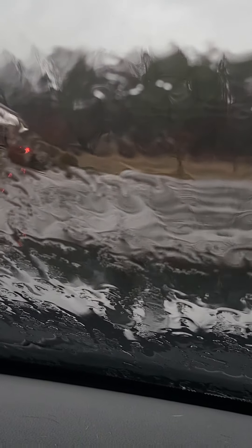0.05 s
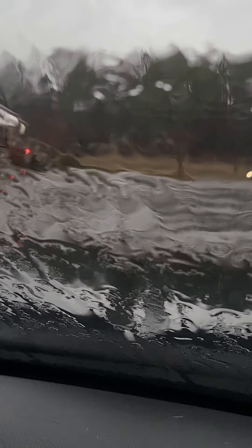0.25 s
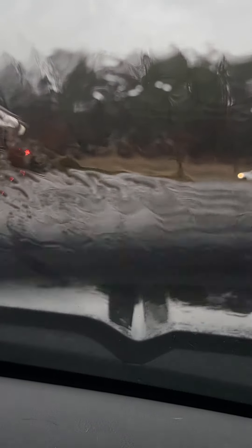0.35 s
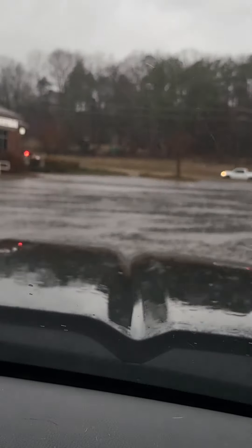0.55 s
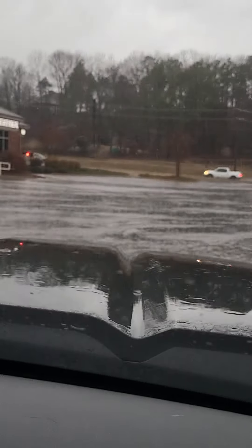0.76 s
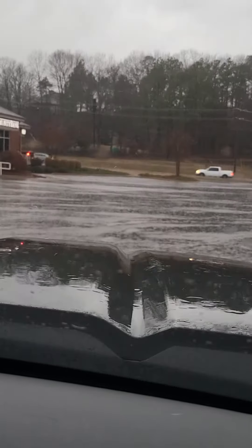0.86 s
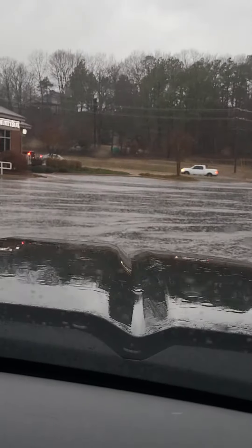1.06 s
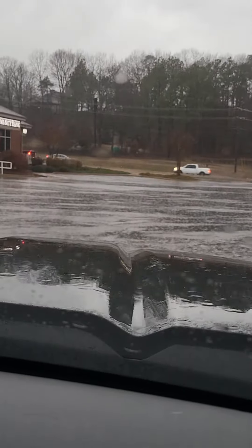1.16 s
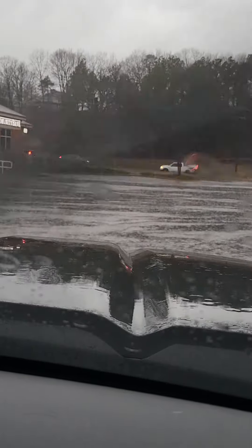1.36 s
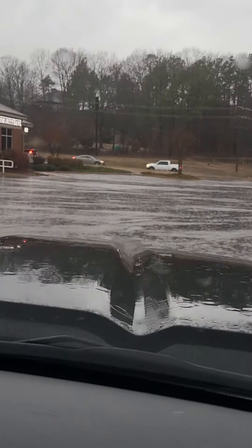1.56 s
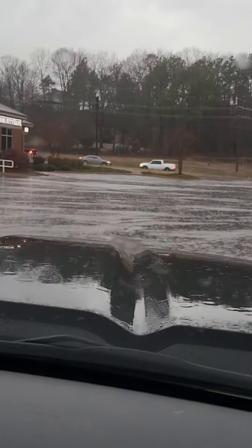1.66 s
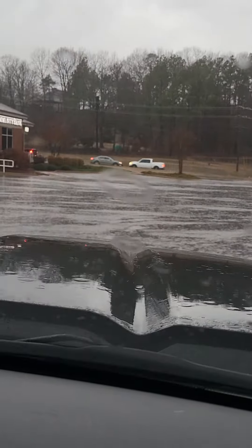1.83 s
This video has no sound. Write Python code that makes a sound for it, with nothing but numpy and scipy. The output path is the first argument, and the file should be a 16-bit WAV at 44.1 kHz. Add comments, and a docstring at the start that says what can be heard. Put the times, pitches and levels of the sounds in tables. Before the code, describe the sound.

Steady rain drumming on a parked car heard from inside, with deep wiper thuds and faint engine hum

```python
"""In the front seat of a standing car, rain patters on the windshield and roof over a low idle rumble.
Drops are short noise bursts with decaying echoes of the cabin; near ones also ring modes of the glass.
The wipers turn twice: the body booms as a sagging tone with an overtone, and rebounds after the first turn.
Blades flap as swelling noise and knock decaying modes of the cowl; hum and idle are wavering sines."""
import sys
import numpy as np
from scipy import signal
from scipy.fft import rfft, irfft, next_fast_len
from scipy.io import wavfile
from scipy.ndimage import map_coordinates

SR = 44100
rng = np.random.default_rng(int(sys.argv[2]) if len(sys.argv) > 2 else 0)


def put_to_file(sound):
    """Save the sound as 16-bit audio at rate SR, in the file named by the first command-line argument."""
    columns = np.atleast_2d(sound).T  # one column per channel
    safe = np.clip(columns, -1, 1)
    whole_steps = np.round(safe * 32767)
    wavfile.write(sys.argv[1], SR, whole_steps.astype(np.int16))


N = 83790


def amp(db):
    """Decibels express the logarithm of an amplitude ratio; return that ratio."""
    return 10 ** (np.asarray(db) / 20)


def unit(x):
    """Mean power sets the level of a noise: scale to an rms of 1."""
    return x / np.sqrt(np.mean(x ** 2) + 1e-20)


def along(points, hz):
    """A spectral envelope is interpolated on a logarithmic frequency axis, from (frequency [Hz], value)."""
    f, v = np.transpose(points)
    return np.interp(np.log(hz + 1), np.log(f + 1), v)


def curve(rows):
    """A slow envelope is linear between its (time [s], value) points; one value per sample."""
    return np.interp(np.arange(N) / SR, *np.transpose(rows))


def wobble(rate):
    """Slow random modulation: a smooth spline through normal random knots, rate knots a second."""
    knots = rng.standard_normal(int(N * rate / SR) + 4)
    return map_coordinates(knots, [np.arange(N) * rate / SR])


def swell(s, half_s):
    """A Gaussian envelope rises and falls around time s, down to 1/e at half_s either side."""
    return np.exp(-((np.arange(N) / SR - s) / half_s) ** 2)


def panned(db):
    """Interaural level difference: left and right gains, with positive db louder on the left."""
    return amp(np.array([[db], [-db]]) / 2)


def coloured(pair, spectrum):
    """Minimum-phase filtering colours two signals; mid-side mixing sets their interaural coherence."""
    # likeness of left and right in the cabin: (frequency [Hz], coherence [0 to 1])
    likeness = [(60, 0.97), (270, 0.96), (500, 0.93), (1000, 0.14), (3000, 0.0023), (12000, 0)]
    m = 2 * next_fast_len(pair.shape[1])
    hz = np.fft.rfftfreq(m, 1 / SR)
    # folding the cepstrum onto positive times makes the filter causal
    cepstrum = irfft(np.log(amp(along(spectrum, hz))))
    cepstrum[1:m // 2] *= 2
    cepstrum[m // 2 + 1:] = 0
    response = np.exp(rfft(cepstrum))
    # mid power minus side power equals the coherence
    turn = np.arccos(np.clip(along(likeness, hz), -1, 1)) / 2
    weights = [np.cos(turn), np.sin(turn)]
    mid, side = irfft(rfft(pair, m) * response * weights)[:, :pair.shape[1]]
    return np.array([mid + side, mid - side])


def noise(spectrum):
    """Stationary noise is white noise through a filter: stereo, of rms 1, with the filter's onset cut off."""
    white = rng.standard_normal((2, N + SR // 2))
    return unit(coloured(white, spectrum)[:, -N:])


def rumble():
    """Phase-modulated tones: the body's hum and the engine's idle, over the cabin's broadband drone."""
    # colour of the cabin's drone: (frequency [Hz], relative level [dB per Hz])
    cabin_colour = [(22, -16), (36, -2.5), (52, -0.5), (105, -3.5), (140, -11.5), (200, -8), (270, -17.5),
                    (360, -15.5), (550, -29.5), (1500, -62.5)]
    # hum of the body, swelling and bending as the wipers sweep: (time [s], pitch [Hz], level [dB rms])
    hum_rows = [(0, 81.9, -45.5), (.4, 82.54, -36.5), (.45, 83.2, -35), (.54, 82.4, -39.5),
                (0.644, 78.93, -30), (.72, 75.7, -38), (.88, 71.24, -37), (.95, 65.6, -29.5),
                (1.07, 63.97, -38), (1.135, 63.3, -27), (1.219, 70.6, -43), (1.3, 73.1, -32.5),
                (1.37, 76.1, -47), (1.53, 75.3, -32.5), (1.63, 75.1, -32), (1.7, 78.54, -51)]
    IDLE_HZ, IDLE_DB, DRONE_DB = 41.05, -45.5, -39.5
    WAVER_RAD = 0.71
    t, rows = np.arange(N) / SR, np.array(hum_rows)
    pitch_hz, level_db = curve(rows[:, :2]), curve(rows[:, ::2])
    hum_phase = 2 * np.pi * np.cumsum(pitch_hz) / SR + WAVER_RAD * wobble(6.16)
    hum = amp(level_db) * np.sin(hum_phase)
    idle = amp(IDLE_DB) * np.sin(2 * np.pi * IDLE_HZ * t + WAVER_RAD * wobble(6))
    # the root of 2 turns rms levels into peak amplitudes
    return np.sqrt(2) * (hum + idle) + amp(DRONE_DB) * noise(cabin_colour)


def splat(spectrum, crack_t60_s, rise_s, size=4096):
    """Impact and reverberation: a crack, a short shiver of the pane, then the cabin's answer; energy 1."""
    GLASS_T60_S, GLASS_DB = 0.014, -9.5
    CABIN_T60_S, CABIN_DB, CABIN_RISE_S = 0.071, -12, 0.01
    t = np.arange(size) / SR
    crack = amp(-60 * t / crack_t60_s)
    shiver = amp(GLASS_DB - 60 * t / GLASS_T60_S)
    hit = (crack + shiver) * (1 - np.exp(-t / rise_s))
    answer = amp(CABIN_DB - 60 * t / CABIN_T60_S) * (1 - np.exp(-t / CABIN_RISE_S))
    drop = coloured((hit + answer) * rng.standard_normal((2, size)), spectrum)
    return drop / np.sqrt(np.sum(drop ** 2) / 2)


def shower(spectrum, per_s, spread_db, count=16):
    """Shot noise: drops of random size land at random on count spots from left to right; rms 1."""
    CRACK_T60_S, CRACK_RISE_S, PAN_SPREAD_DB = 0.0053, 0.0014, 0.5
    out = np.zeros((2, N))
    for side in np.linspace(-1, 1, count):
        lands = rng.random(N) < per_s / count / SR
        # the largest drops are capped at 1.5 deviations
        sizes = amp(spread_db * np.minimum(rng.standard_normal(N), 1.5))
        drop = splat(spectrum, CRACK_T60_S, CRACK_RISE_S)
        spot = signal.fftconvolve((lands * sizes)[None], drop, axes=1)[:, :N]
        out += spot * panned(side * PAN_SPREAD_DB)
    return unit(out)


def pings(size=2048):
    """Damped resonance: some drops ring a panel for a few cycles, each at its own pitch."""
    PINGS_PER_S, LOWEST_HZ, HIGHEST_HZ = 100, 949, 2970
    DECAY_CYCLES, WEAKEST_DB, RANGE_DB = 10, -0.5, 8
    out, t = np.zeros((2, N + size)), np.arange(size) / SR
    for when, pitch, strength, left, right in rng.random((int(PINGS_PER_S * N / SR), 5)):
        cycles = (LOWEST_HZ + pitch * (HIGHEST_HZ - LOWEST_HZ)) * t
        fade = np.exp(-cycles / DECAY_CYCLES) * (1 - np.exp(-cycles))
        ring = np.sin(2 * np.pi * (cycles + np.array([[left], [right]])))
        out[:, int(when * N):][:, :size] += amp(WEAKEST_DB + RANGE_DB * strength) * fade * ring
    return out[:, :N]


def rain():
    """Superposition: patter, spray, pings and the wash of rain outside share one strength envelope."""
    # strength of the rain: (time [s], level [dB])
    strength = [(0, -49), (.08, -51.5), (.14, -50), (.42, -47), (.47, -52), (.51, -48), (.78, -46),
                (.9, -44.5), (.98, -48.5), (1.16, -43.5), (1.21, -46), (1.36, -43.5), (1.65, -43),
                (1.75, -48), (1.8, -43.5), (1.9, -45)]
    # colour of the dense patter: (frequency [Hz], relative level [dB per Hz])
    patter_colour = [(100, -22), (220, -2), (370, 4.5), (520, -8.5), (630, 3.5), (760, -3), (1000, 2),
                     (1400, 4), (1680, -8), (1900, 1), (2200, 0), (2750, -2), (3200, -8), (3650, -6),
                     (4600, -15), (7000, -21.5), (8600, -27), (12000, -29), (16000, -35)]
    # colour of the bright spray: (frequency [Hz], relative level [dB per Hz])
    spray_colour = [(500, -9), (3000, -16), (7000, 27), (8600, -11), (12000, 1), (16000, 1.5)]
    # colour of the wash behind the patter: (frequency [Hz], relative level [dB per Hz])
    wash_colour = [(88, -44.5), (150, -4), (366, -4.5), (420, -9.5), (844, -8.5), (1240, -15),
                   (1700, -12.5), (2760, -19), (5030, -32), (7270, -32.5), (8660, -49.5), (15500, -41)]
    PATTER_DB, SPRAY_DB, WASH_DB = 0.5, -24, -2.5
    patter = amp(PATTER_DB) * shower(patter_colour, per_s=420, spread_db=5.5)
    spray = amp(SPRAY_DB) * shower(spray_colour, per_s=64, spread_db=3)
    wash = amp(WASH_DB) * noise(wash_colour)
    return amp(curve(strength)) * (patter + spray + pings() + wash) * panned(db=-1)


def near_drops():
    """Impact excitation of modes: big drops tick on the windshield and set the pane ringing."""
    # near drops: (time [s], level [dB], treble [dB], body [dB], left over right [dB], ring [dB re level])
    drops = [(0.135, -30.5, -26, -2.5, -9.5, -19), (0.1635, -30.5, -21.5, 5, 0, -3.5),
             (0.2528, -34, -24, -8.5, -5.5, 0), (0.2969, -35.5, -17.5, 1, -11, -4),
             (0.3077, -37, -31, -4, -10, -2), (0.3583, -37, -39, 0, 0, -8), (0.4295, -35, -31, 7, 2, 0),
             (0.5091, -34.5, -47, -5, -3, -2), (0.598, -38.5, -30, 0, -7, 9),
             (0.631, -35.5, -23.5, -13, -10, -22), (0.696, -30.5, -36, 1, 1, -5),
             (0.7483, -27, -30.5, -6, -2, -7), (0.826, -28.5, -32, 1.5, -3, -3),
             (0.851, -36, -51, -7, -4, 5.5), (0.877, -26, -58, -7, -3, -8), (1.033, -34.5, -34, -22, 1, 8),
             (1.06, -30, -35.5, -39, -10, -19), (1.0763, -23, -34, -1.5, 1.5, -30),
             (1.1182, -29.5, -25.5, -3, -10.5, -6), (1.1532, -24.5, -29, 5.5, -1.5, -5.5),
             (1.2545, -33, -24.5, -5, -1, 1), (1.3587, -27.5, -27.5, -4, -2.5, -2),
             (1.4717, -28, -21, 13, -0.5, -9), (1.5217, -25, -24.5, 6, -1, -7),
             (1.6274, -39.5, -1, 1, -1, 9), (1.6907, -30, -27, -9, 1, 1), (1.7787, -30, -26, 1, 0, -27)]
    # usual colour of a tick: (frequency [Hz], relative level [dB])
    tick_colour = [(150, -42), (400, -1), (1300, 2.5), (2700, 3.5), (3800, -2), (5000, -7.5), (7200, -9.5),
                   (8800, -21.5), (12000, -17), (16000, -23)]
    # modes of the windshield: (frequency [Hz], level [dB])
    pane_modes = [(1330, -3.5), (1950, -8), (2460, -1), (2770, -11)]
    TICK_DB, TREBLE_USUAL_DB, BODY_USUAL_DB = 15.5, -24, -4.5
    CRACK_T60_S, CRACK_RISE_S = 0.0072, 0.0023
    RING_T60_S, RING_RISE_S = 0.045, 0.0018
    out = np.zeros((2, N + SR))
    for s, db, treble_db, body_db, pan_db, ring_db in drops:
        # treble and body tilt the usual colour by their departure from the usual
        tilt = [(1200, body_db - BODY_USUAL_DB), (2800, 0.009), (9000, treble_db - TREBLE_USUAL_DB)]
        colour = [(hz, level + along(tilt, hz)) for hz, level in tick_colour]
        tick = amp(TICK_DB) * splat(colour, CRACK_T60_S, CRACK_RISE_S)
        t = np.arange(tick.shape[1]) / SR
        fade = amp(ring_db - 60 * t / RING_T60_S) * (1 - np.exp(-t / RING_RISE_S))
        modes = np.zeros_like(tick)
        for hz, level in pane_modes:
            strength = amp(level + 2 * rng.standard_normal())
            modes += strength * np.sin(2 * np.pi * hz * t + np.pi * rng.random((2, 1)))
        ring = fade * modes / 2
        out[:, round(s * SR):][:, :len(t)] += amp(db) * (tick + ring) * panned(pan_db)
    return out[:, :N]


def body_booms():
    """Transient body resonance: a tone of sagging pitch and an inharmonic overtone swell and fade."""
    # wiper thumps and a rebound: (time of the height [s], pitch there [Hz], level [dB], half length [s])
    thumps = [(0.246, 75.1, -12.5, 0.024), (.369, 68, -20.5, 0.02), (1.000, 65.6, -13, 0.036)]
    SAG_PER_S, OVERTONE_RATIO, OVERTONE_DB = 0.88, 2.77, -24
    t, out = np.arange(N) / SR, np.zeros((2, N))
    for s, hz, db, half_s in thumps:
        phase = 2 * np.pi * hz * (t - s) * (1 - SAG_PER_S * (t - s) / 2)
        tone = np.cos(phase) + amp(OVERTONE_DB) * np.sin(OVERTONE_RATIO * phase)
        out += amp(db) * swell(s, half_s) * tone
    return out


def blade_flips():
    """Modal excitation: blades flip or catch with a dull flap of noise and knock the cowl's damped modes."""
    # flips of the rubber blades: (time [s], flap level [dB], knock level [dB], half length of flap [s])
    flips = [(.2375, -25.5, -31.5, 0.023), (0.308, -34, -41.5, 0.01), (0.956, -29, -22, 0.021),
             (1.075, -32, -37, 0.0087), (1.586, -36, -40, 0.011), (1.699, -37, -40.5, 0.01)]
    # colour of the flap: (frequency [Hz], relative level [dB per Hz])
    flap_colour = [(60, -13.5), (115, 9.5), (180, -2.5), (260, -14), (340, -15), (450, -13), (560, -28.5),
                   (900, -21.5), (3000, -77)]
    # modes under the wiper arms: (frequency [Hz], level [dB], decay time t60 [s])
    cowl_modes = [(181.3, -3, 0.2), (284, -3.5, 0.092), (337, -7.5, 0.091)]
    FLAP_LAG_S, KNOCK_RISE_S = 0.007, 0.0012
    t, out, flap = np.arange(N) / SR, np.zeros((2, N)), noise(flap_colour)
    for s, flap_db, knock_db, half_s in flips:
        age = np.maximum(t - s, 0)
        knock = np.zeros(N)
        for hz, db, t60 in cowl_modes:
            knock += amp(db - 60 * age / t60) * np.sin(2 * np.pi * hz * age)
        out += amp(knock_db) * knock * (1 - np.exp(-age / KNOCK_RISE_S))
        out += amp(flap_db) * swell(s + FLAP_LAG_S, half_s) * flap
    return out


def wipers():
    """Superposition: booms of the body add to the flaps and knocks of the blades."""
    return body_booms() + blade_flips()


def scene():
    """Linear superposition of every source, as heard from the front seat."""
    return rumble() + rain() + near_drops() + wipers()


def record(dry):
    """Band limitation: the microphone keeps nothing above its band limit."""
    TOP_HZ = 15900
    m = next_fast_len(N + SR // 2)
    kept = np.fft.rfftfreq(m, 1 / SR) < TOP_HZ
    return irfft(rfft(dry, m) * kept, m)[:, :N]


dry = scene()
out = record(dry)
put_to_file(out)
```